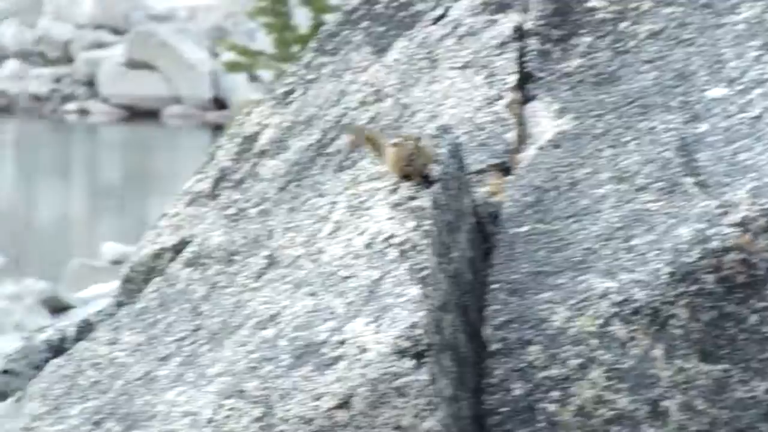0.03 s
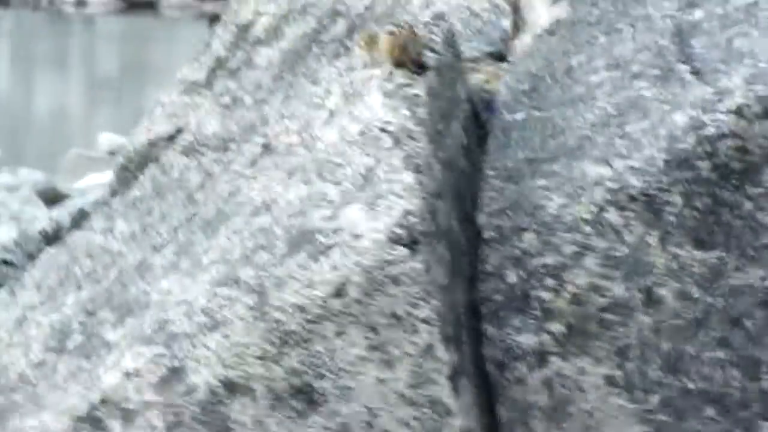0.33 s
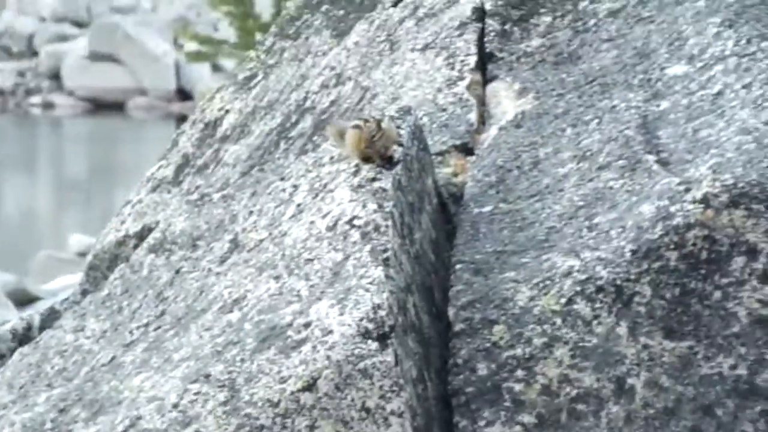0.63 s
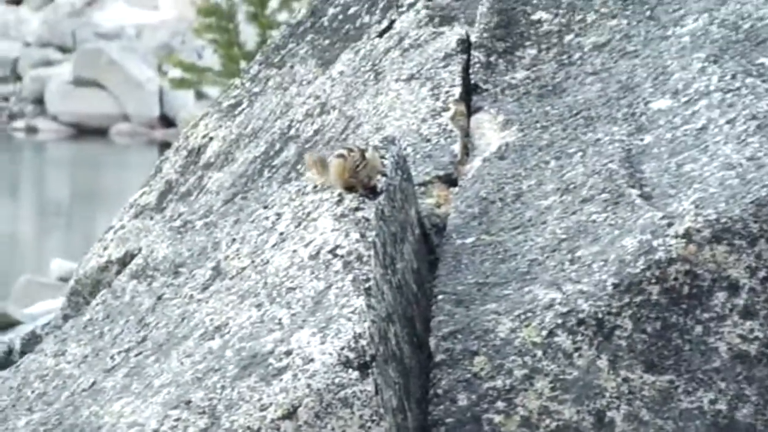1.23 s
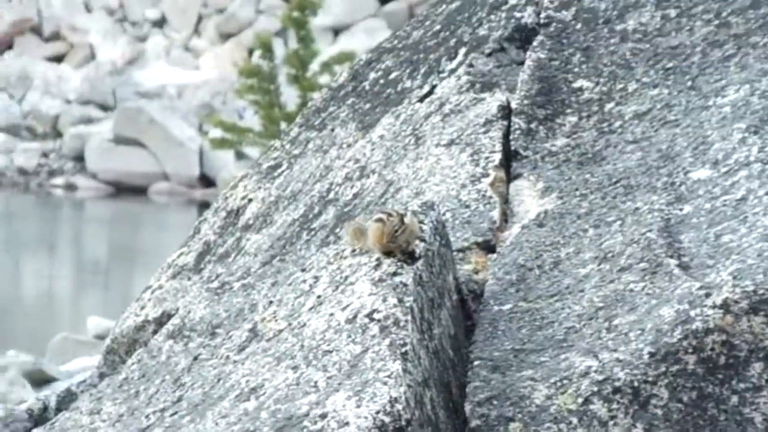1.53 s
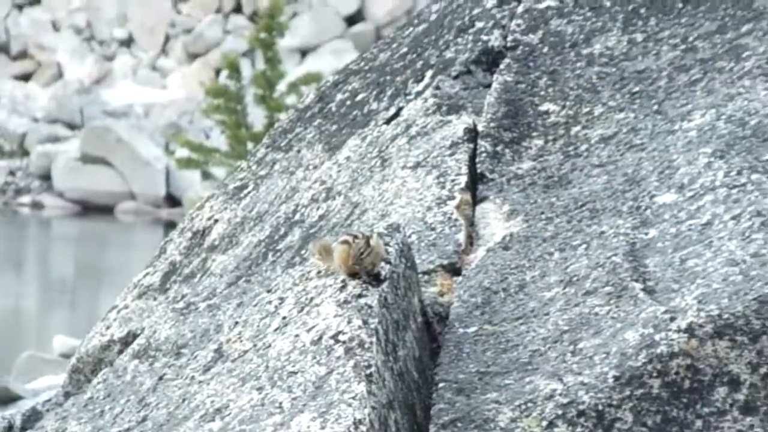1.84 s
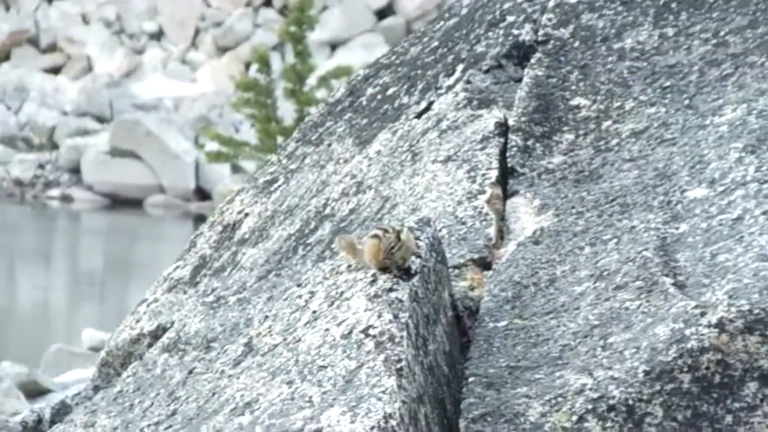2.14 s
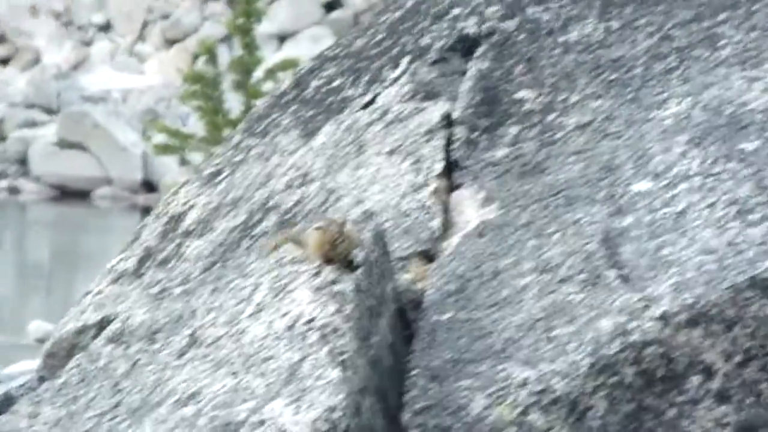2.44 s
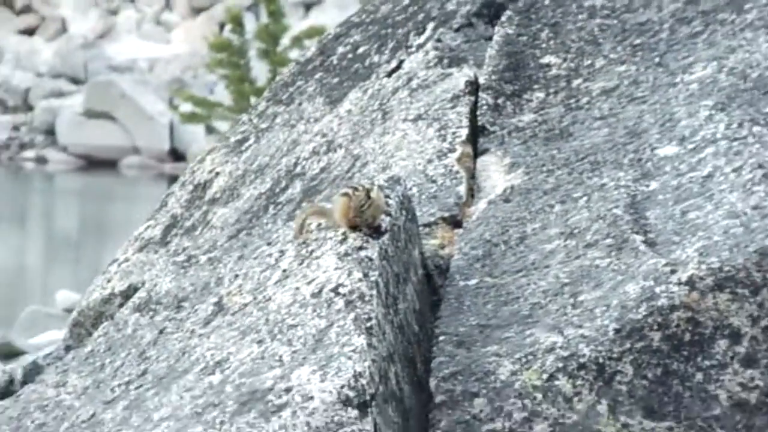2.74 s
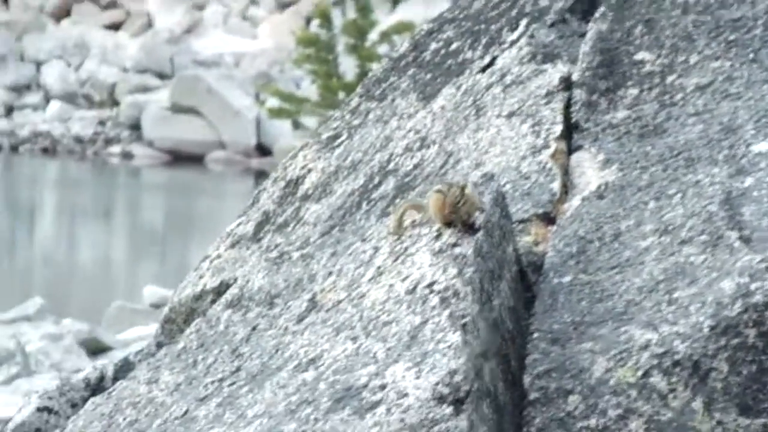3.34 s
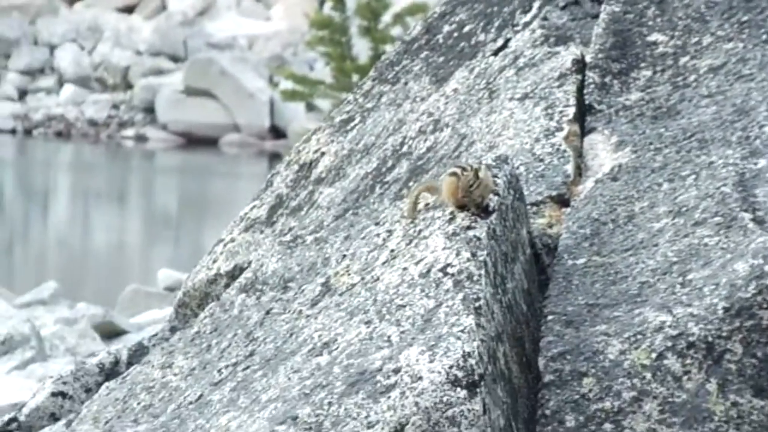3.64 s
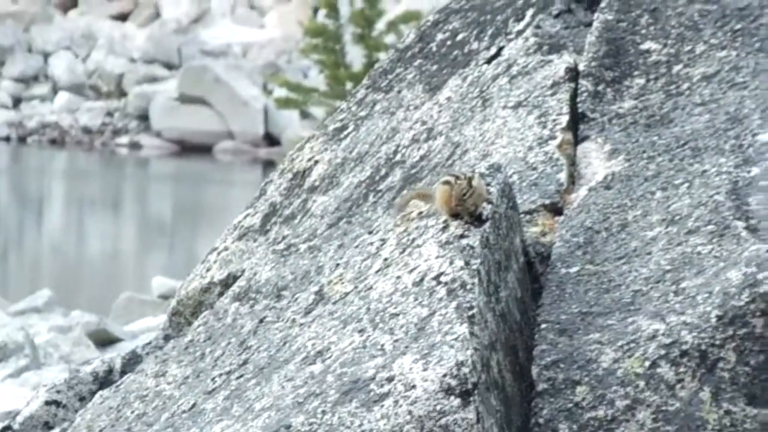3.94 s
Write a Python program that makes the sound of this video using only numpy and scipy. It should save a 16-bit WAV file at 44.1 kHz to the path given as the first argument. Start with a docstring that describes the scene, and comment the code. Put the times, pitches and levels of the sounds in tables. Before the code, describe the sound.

Short, high-pitched chipmunk chirps repeat quickly, with soft wind buffeting the microphone.

```python
"""A chipmunk on a granite boulder by a lake gives thirteen sharp chips.
Each is a 30 ms upward sweep: a buzzy squeak breaks into a pure whistle, and the rocks scatter it back.
Wind buffets the microphone; the hand-held camera knocks, ticks and whines faintly
over the hush of distant water and air."""
import sys
import numpy as np
from scipy import signal
from scipy.fft import rfft, irfft
from scipy.io import wavfile
from scipy.ndimage import uniform_filter1d

SR = 44100
rng = np.random.default_rng(int(sys.argv[2]) if len(sys.argv) > 2 else 0)


def put_to_file(sound):
    """Save the sound as 16-bit audio at rate SR, in the file named by the first command-line argument."""
    columns = np.atleast_2d(sound).T  # one column per channel
    safe = np.clip(columns, -1, 1)
    whole_steps = np.round(safe * 32767)
    wavfile.write(sys.argv[1], SR, whole_steps.astype(np.int16))


N = 176400


def chipmunk(first_cut_s=0.106):
    """Chips heard among the rocks; the echo of the first is cut short."""
    # Each row: start in s, gain in dB, then the ending's top pitch in Hz, gain in dB, time stretch.
    chips = [(0.0673, -2.5, 11100, 3.5, 0.86), (0.2410, -0.5, 10940, 1.5, 0.88),
             (0.5854, -1, 11100, -2, 1.16), (0.9505, 0, 11030, 1, 0.89), (1.2109, 0.5, 10860, -1, 0.81),
             (1.4726, 1, 10950, 0.5, 0.78), (1.7557, 1.2, 10860, -1.5, 0.78), (2.0679, 0, 10980, 0, 0.82),
             (2.3015, 0.4, 11110, 4.5, 1), (2.9155, 0.5, 11110, 1.5, 0.92), (3.3277, 0.3, 11180, 2, 0.91),
             (3.5933, 1.6, 11230, 4, 1), (3.923, 2, 11110, -2, 0.87)]
    out = np.zeros(N)
    for k, (start_s, db, top_hz, top_db, stretch) in enumerate(chips):
        echoed = signal.fftconvolve(chip(top_hz, top_db, stretch), rocks())
        add(out, start_s, from_db(db) * echoed)
        if k == 0:
            out[int(first_cut_s * SR):] = 0
    return out


def chip(top_hz, top_db, stretch):
    """A soft, buzzy squeak breaks into a whistle."""
    return whistle(top_hz, top_db, stretch) + squeak()


def squeak():
    """Raspy rising onset, rich in harmonics."""
    # Each row: time in ms, pitch in Hz, relative level in dB, overtone gain in dB.
    contour = [(0, 1596, -65, -16), (2, 1835, -51.5, -18), (5, 2170, -43, -9), (8, 2710, -43.5, 7),
               (9.4, 3034, -46.5, 15), (11, 3100, -47.5, -5), (12, 1250, -66, -16)]
    # Relative levels of harmonics 2-6 in dB.
    overtones_db = [0, -7, -16, -15, -19]
    return voice(*np.transpose(contour), overtones_db, rasp=0.29)


def whistle(top_hz, top_db, stretch, ending_ms=20, nominal_top_hz=11100):
    """Nearly pure upward sweep; the high ending varies from chip to chip."""
    # Each row, nominal: time in ms, pitch in Hz, level in dB, octave in dB re the fundamental.
    contour = [(8.94, 4376, -49, -16), (10.12, 4673, -27, -10), (13.35, 5080, -23.5, -18.5),
               (14.6, 6070, -18.5, -22), (15.81, 6064, -15, -25), (16.17, 6180, -20.5, -18),
               (17.15, 6480, -22.5, -20), (18.44, 6840, -17.5, -33), (18.68, 6800, -28.5, -38),
               (19.75, 8600, -33.5, -27), (21.7, 9950, -41, -30), (23.6, 10640, -30, -30),
               (24.8, 11270, -28.5, -30), (27.2, 11130, -33, -30), (29.4, 10000, -46, -30)]
    ms, hz, db, octave_db = np.transpose(contour)
    ending = np.clip((ms - ending_ms) / 2, 0, 1)
    ms = ms + np.maximum(ms - ending_ms, 0) * (stretch - 1)
    hz = hz * (top_hz / nominal_top_hz) ** ending
    return voice(ms, hz, db + top_db * ending, octave_db, overtones_db=[0], rasp=0.033)


def voice(ms, hz, db, bright_db, overtones_db, rasp):
    """A gliding tone and its harmonics; rasp sets the flutter in strength."""
    t_ms = np.arange(0, 40, 1000 / SR)
    ms = np.maximum.accumulate(ms)
    pitch_hz = np.interp(t_ms, ms, hz)
    envelope = from_db(np.interp(t_ms, ms, db)) * (t_ms >= ms[0]) * (t_ms <= ms[-1])
    phase = 2 * np.pi * np.cumsum(pitch_hz) / SR
    flutter = rms_one(uniform_filter1d(rng.standard_normal((2, len(t_ms))), size=24, axis=1))
    fundamental = np.sin(phase) * (1 + rasp * flutter[0] / 2)
    overtones = sum(from_db(gain_db) * np.sin(k * phase) * (k * pitch_hz < SR / 2)
                    for k, gain_db in enumerate(overtones_db, 2))
    overtones *= from_db(np.interp(t_ms, ms, bright_db)) * (1 + rasp * flutter[1])
    return envelope * (fundamental + overtones)


def rocks(scatter_db=-14.5, t60_s=0.21, rise_s=0.0026):
    """Impulse response: direct path, echoes off near rock faces, scatter from the boulder field."""
    # Each row: delay in ms, level in dB re the direct path.
    echoes = [(2.8, -12.5), (5.9, -22), (8.1, -17), (13.6, -27.5), (21.3, -29.5)]
    # Each row: frequency in Hz, relative level of the scatter in dB.
    spectrum = [(1800, -5), (3500, 3), (5000, 2), (6300, 1), (7500, 1.5), (9500, 7), (11000, -4),
                (14000, -2.5)]
    t = np.arange(SR // 2) / SR
    envelope = from_db(-60 * t / t60_s) * (1 - np.exp(-t / rise_s))
    scatter = colour(rng.standard_normal(len(t)), spectrum) * envelope
    paths = from_db(scatter_db) * scatter / np.linalg.norm(scatter)
    paths[0] += 1
    for delay_ms, db in echoes:
        paths[int(delay_ms * SR / 1000)] += from_db(db)
    return paths


def wind(gain_db=4.5):
    """Eddies buffet the microphone in low gusts."""
    # Each row: time in s, relative gust level in dB.
    gusts = [(0.1, -27.5), (0.18, -38), (0.31, -31.5), (0.37, -35), (0.439, -25.5), (0.55, -38),
             (0.9, -40.5), (1.0, -31.5), (1.12, -28), (1.3, -45.5), (1.45, -31), (1.57, -31), (1.74, -46),
             (1.852, -32.5), (1.92, -41), (2.02, -31), (2.25, -39.5), (2.5, -37), (2.8, -45), (2.93, -27.5),
             (3.05, -29.5), (3.2, -45.5), (4.0, -45.5)]
    # Each row: frequency in Hz, relative spectral density in dB.
    spectrum = [(7, -8), (14, 2.5), (25, -5), (40, -16.5), (60, -23), (100, -36), (200, -47), (500, -78)]
    eddies = colour(rng.standard_normal(N), spectrum)
    eddies /= np.sqrt(uniform_filter1d(eddies ** 2, size=SR // 6))   # unit running rms
    gust_db = np.interp(np.arange(N) / SR, *np.transpose(gusts))
    return from_db(gain_db + gust_db) * eddies * fade_in(length_s=0.012)


def knocks(thump_s=0.0014):
    """Fingers knock the camera body: a softened ring and a low thump."""
    # Each row: start in s, ring gain in dB, contact low-pass in Hz, thump peak in dB.
    hits = [(0.738, -50, 200, -32.5), (2.3815, -35, 895, -22), (2.3926, -33, 2200, -28),
            (2.3946, -31, 2220, -34), (2.4331, -40.5, 1200, -46)]
    # Each row: frequency in Hz, relative level in dB, T60 in s.
    body_modes = [(170, -1.5, 0.039), (335, -3.5, 0.053), (561, -4, 0.031), (710, 1, 0.02),
                  (887, -1.5, 0.024), (1102, -8.5, .06), (1370, -14, 0.038), (2110, -5, 0.017)]
    out = np.zeros(N)
    t = np.arange(SR // 10) / SR
    thump = -t / thump_s * np.exp(1 - t / thump_s)
    for start_s, ring_db, soft_hz, thump_db in hits:
        ring = signal.lfilter(*signal.butter(1, soft_hz, fs=SR), strike(body_modes, crack_db=-1.5))
        add(out, start_s, from_db(ring_db) * ring + from_db(thump_db) * thump)
    return out


def ticks():
    """The camera casing ticks and rings briefly."""
    # Each row: start in s, gain in dB, relative crack gain in dB.
    hits = [(0.129, -50, -5), (0.1333, -51.5, -8), (0.1417, -42, 3), (0.674, -55, 7), (2.014, -55, 3),
            (2.3474, -42.5, -7)]
    # Each row: frequency in Hz, relative level in dB, T60 in s.
    casing_modes = [(1630, 3.5, 0.0071), (3030, 6, 0.014), (3600, 0, 0.0092), (5200, 3, .004),
                    (7100, -16, .003)]
    out = np.zeros(N)
    for start_s, db, crack_db in hits:
        add(out, start_s, from_db(db) * strike(casing_modes, crack_db))
    return out


def strike(modes, crack_db, crack_s=0.0025, dull_hz=5000, spread_db=1.9):
    """Impact: a dull crack plus decaying modes whose levels vary from hit to hit."""
    t = np.arange(SR // 10) / SR
    ring = np.zeros(len(t))
    for k, (hz, db, t60_s) in enumerate(modes):
        envelope = from_db(db + rng.normal(0, spread_db) - 60 * t / t60_s)
        ring += (-1) ** k * envelope * np.sin(2 * np.pi * hz * t)
    burst = rng.standard_normal(len(t)) * np.exp(-t / crack_s)
    crack = signal.lfilter(*signal.butter(2, dull_hz, fs=SR), burst)
    return ring + from_db(crack_db) * crack


def shore(rms_db=-52.5):
    """Even hush of distant water and air."""
    # Each row: frequency in Hz, relative spectral density in dB.
    spectrum = [(50, -8), (90, 0.5), (270, -7), (450, -11), (680, -14.5), (900, -17.5), (1500, -21),
                (6500, -29), (9000, -33.5), (14000, -37.5)]
    return from_db(rms_db) * rms_one(colour(rng.standard_normal(N), spectrum))


def whine(pitch_hz=7867, frames_per_s=30):
    """Thin tone of the camera electronics, flipping phase each frame."""
    # Each row: time in s, rms level in dB.
    levels = [(0, -72), (.55, -71), (.8, -67.5), (4, -68.5)]
    t = np.arange(N) / SR
    amplitude = np.sqrt(2) * from_db(np.interp(t, *np.transpose(levels)))
    flips = uniform_filter1d((-1.) ** np.floor(t * frames_per_s), size=60)
    return amplitude * flips * np.sin(2 * np.pi * pitch_hz * t)


def from_db(db):
    """Decibels to gain."""
    return 10 ** (np.asarray(db) / 20)


def rms_one(x):
    """Scale to unit rms."""
    return x / np.sqrt(np.mean(x ** 2) + 1e-20)


def colour(x, spectrum):
    """Filter by (Hz, dB) points, interpolated in log frequency."""
    hz, db = np.transpose(spectrum)
    bins_hz = np.maximum(np.fft.rfftfreq(len(x), 1 / SR), 1)
    gain = from_db(np.interp(np.log(bins_hz), np.log(hz), db))
    return irfft(rfft(x) * gain, len(x))


def add(out, start_s, sound):
    """Mix a sound in at start_s."""
    i = max(int(round(start_s * SR)), 0)
    out[i:i + len(sound)] += sound[:N - i]


def fade_in(length_s, start_s=0.082):
    """Silence, then a smooth rise to unit gain."""
    progress = np.clip((np.arange(N) / SR - start_s) / length_s, 0, 1)
    return np.sin(np.pi / 2 * progress) ** 2


def scene():
    """All sources at one microphone."""
    return (chipmunk() + knocks() + ticks() + wind() + shore() + whine())[None]


def record(dry, cutoff_hz=14200):
    """Brief opening silence and a steep low-pass."""
    lowpass = signal.ellip(10, 0.1, 80, cutoff_hz, fs=SR, output="sos")
    return signal.sosfilt(lowpass, dry * fade_in(length_s=0.001))


dry = scene()
out = record(dry)
put_to_file(out)
```